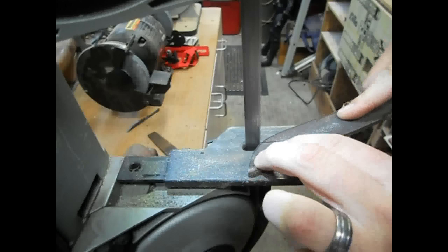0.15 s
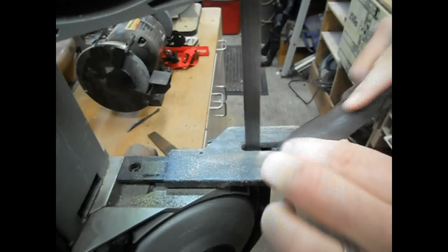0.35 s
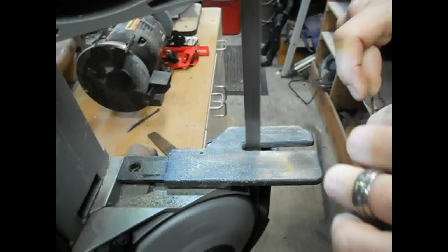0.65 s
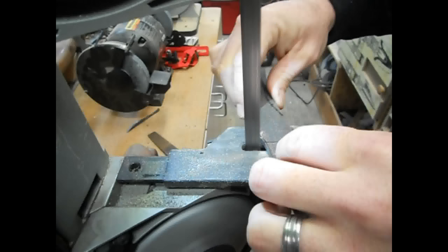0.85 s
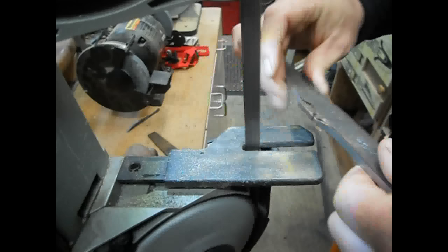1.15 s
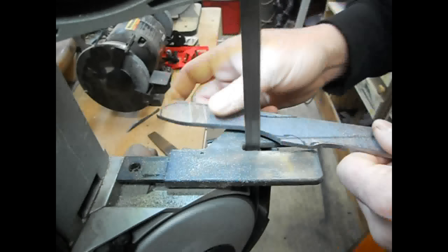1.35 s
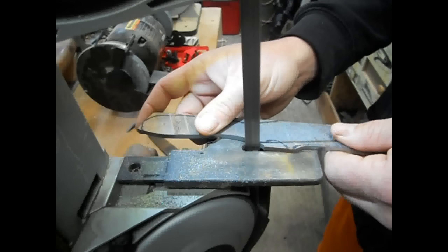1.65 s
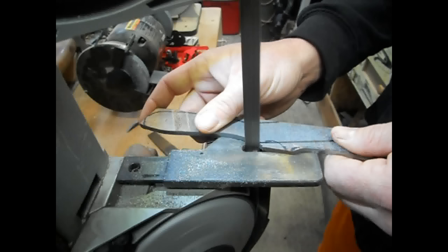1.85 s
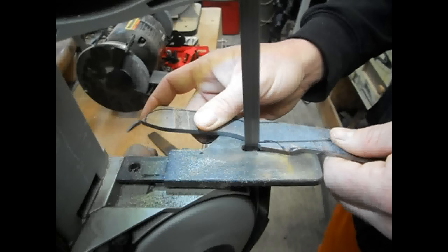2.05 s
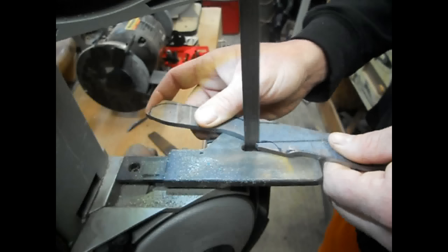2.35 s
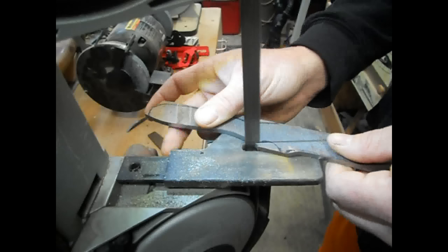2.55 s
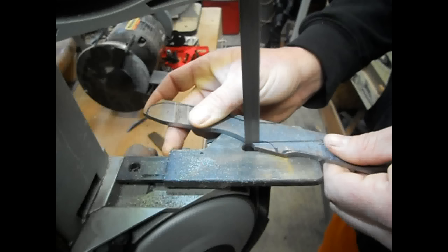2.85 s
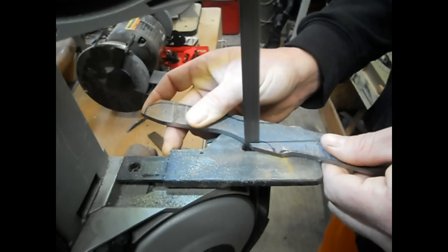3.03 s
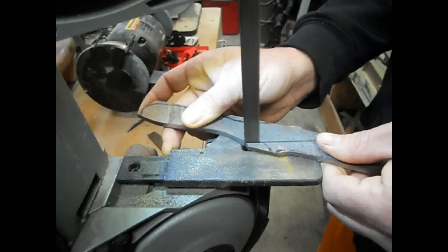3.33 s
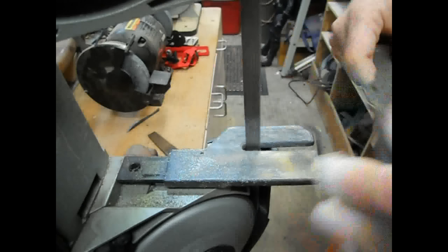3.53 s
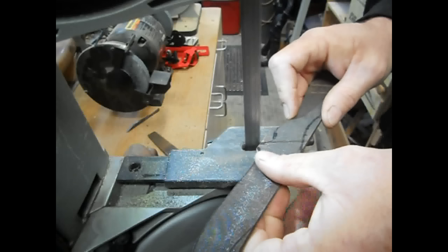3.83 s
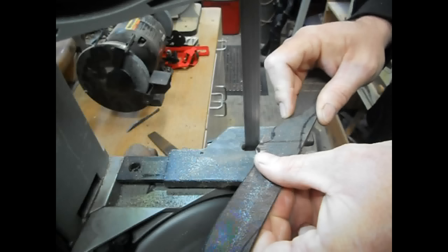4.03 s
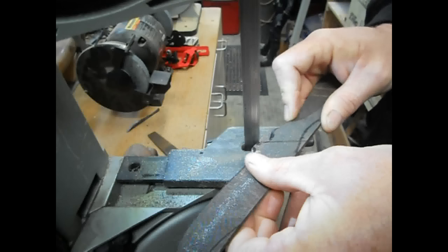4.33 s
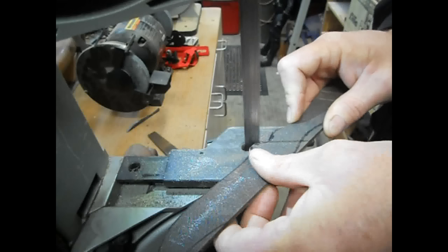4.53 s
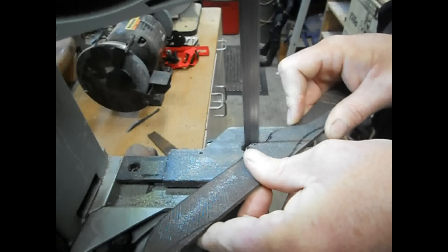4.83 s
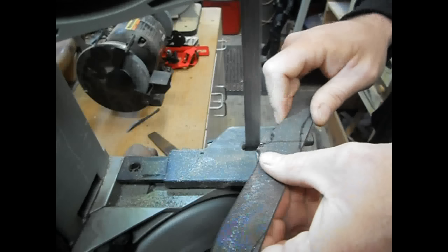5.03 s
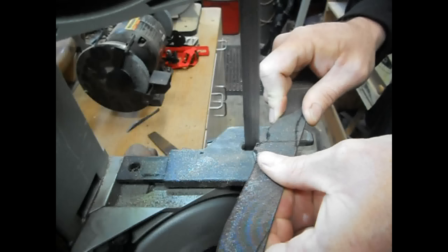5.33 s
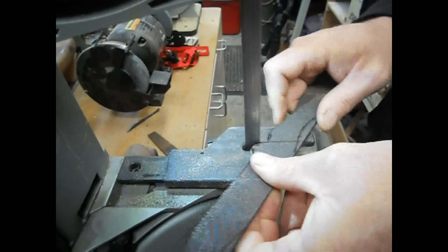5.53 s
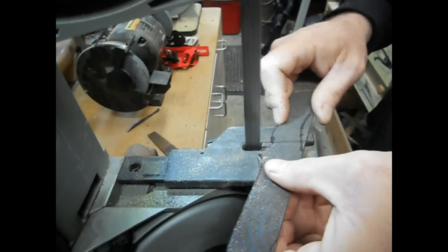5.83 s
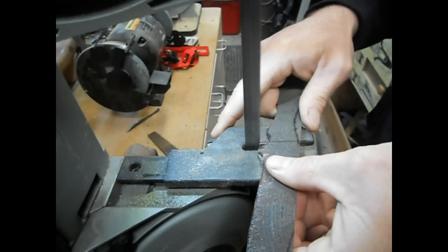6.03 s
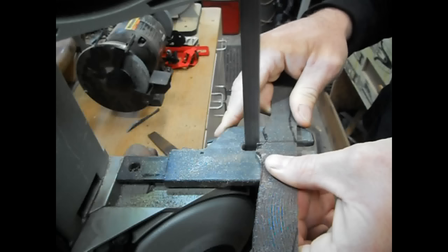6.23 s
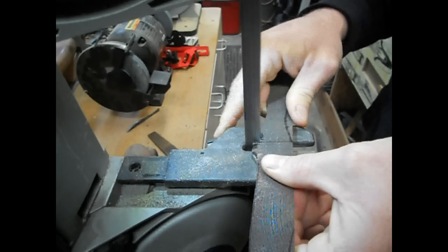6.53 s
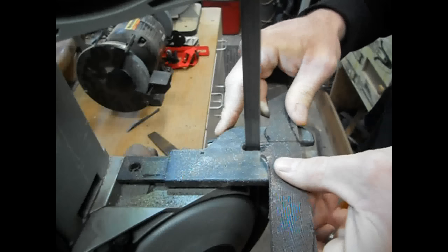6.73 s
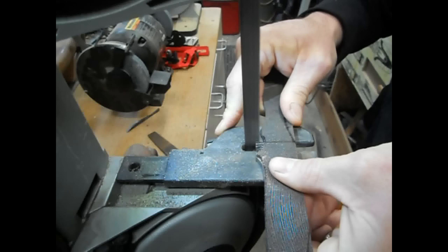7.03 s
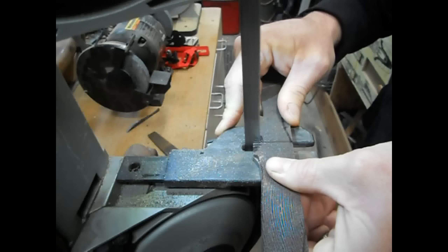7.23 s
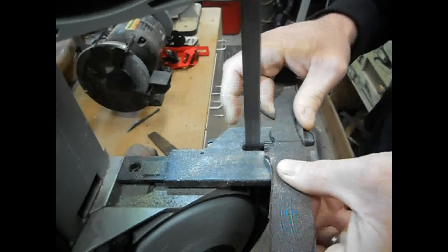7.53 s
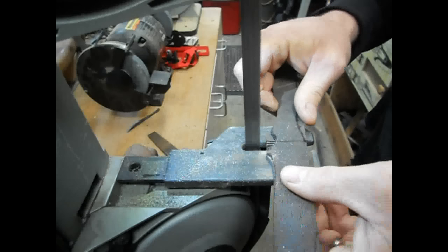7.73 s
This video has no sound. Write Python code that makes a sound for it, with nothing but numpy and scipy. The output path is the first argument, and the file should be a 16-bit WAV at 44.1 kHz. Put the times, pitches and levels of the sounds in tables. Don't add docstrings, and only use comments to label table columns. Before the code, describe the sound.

A metal-cutting bandsaw roars steadily in a workshop, with a thin, very high gear whine wavering and a low growl as steel is cut.

```python
import sys
import numpy as np
from scipy import signal
from scipy.fft import rfft, irfft, next_fast_len
from scipy.io import wavfile
from scipy.ndimage import uniform_filter1d

SR = 44100
rng = np.random.default_rng(int(sys.argv[2]) if len(sys.argv) > 2 else 0)


def unload_audio(sound):
    columns = np.transpose(np.atleast_2d(sound))
    steps = np.round(np.clip(columns, -1, 1) * 32767)
    wavfile.write(sys.argv[1], SR, steps.astype(np.int16))


def amplitude_ratio(level_db):
    exponent = np.asarray(level_db, float) / 20
    return 10 ** exponent


N = 347508

# pitch_hz, level_db (per Hz)
HOUSING_COLOUR = [(20, -23), (120, -22.5), (430, -17), (540, -13), (640, -3), (1300, -3), (1500, -9.5),
                  (2200, -14), (2700, -8), (3100, -4), (5500, -3.5), (7000, -8.5), (8400, -10.5),
                  (10500, -9)]
# pitch_hz, width_hz, level_db (over the housing colour)
FRAME_RINGS = [(66, 26, 9), (690, 70, 0), (781, 26, 3), (1037, 26, 2), (1215, 60, 1), (1550, 25, 4),
               (3103, 36, 4), (3360, 45, 1), (3620, 110, 2), (4150, 50, 2), (4387, 30, 4), (4900, 300, 1),
               (5700, 100, -3), (6210, 60, 3), (8030, 120, -2), (9320, 70, 0)]
# pitch_hz, width_hz, level_db
TABLE_RINGS = [
    (143, 29, -7),
    (206, 40, 2),
    (266, 68, 2),
    (363, 81, -2.5),
]
# pitch_hz, level_db
SHAFT_TONES = [
    (781, -44.5),
    (1037, -46),
    (3103, -47.5),
    (4387, -46.5),
]
# share_of_hum_pitch, level_db (against the growl)
TOOTH_BEATS = [
    (2 / 8, -13),
    (3 / 8, -11),
    (4 / 8, -7),
]
# start_s, roar_db, whistle_db, high_air_db
MACHINE = [(0, -15, -24, -0.5), (.52, -15.5, -24, 0), (.7, -14, -24.5, 0), (1.0, -15, -23.5, 3),
           (1.5, -14, -23, 0.5), (2.0, -15, -25, -4), (2.7, -15, -25, -2), (3.3, -15, -24, -3),
           (3.85, -14.5, -24.5, 4.5), (4.35, -15, -26.5, -3), (4.85, -14, -26, -1), (5.2, -14, -31, -3),
           (5.46, -16.5, -34, -0.5), (5.54, -14.5, -26, -1.5), (5.9, -15, -25.5, 6), (6.3, -15, -23, -2.5),
           (6.85, -15, -24.5, -1.5), (7.88, -15, -24, 5)]
# start_s, end_s, start_force (0-1), end_force (0-1), table_share
PUSHES = [(-.2, .08, .3, 0.12, 4), (.3, .52, .3, 0.2, .6), (.95, 1.18, 0.25, 0.06, .6),
          (1.3, 2.449, 0.1, 1, 1.3), (2.55, 3.42, 0.8, .8, 0.96), (3.55, 3.85, 0, 0.1, .5),
          (4.099, 4.46, 0.46, 0.85, 0.58), (4.497, 4.927, 1, 0.7, .45), (5.12, 5.4, 0.66, 0.45, 1.2),
          (6.039, 6.525, 1, .9, .6), (6.663, 7.449, 0.9, 0.76, 0.58)]
# start_s, sag_hz
SNAGS = [(0.0, 62), (0.075, 50), (0.29, 60), (0.53, 56.6), (0.69, 50), (0.89, 55), (1.07, 45), (1.25, 38.2),
         (1.51, 79), (1.7, 29), (1.87, 35.4), (2.03, 44.5), (2.55, 97.5), (2.74, 58), (3.17, 37.1),
         (3.51, 66.6), (3.85, 70.7), (4.01, 86), (4.19, 48.7), (4.54, 133.6), (4.73, 40), (5.04, 110.2),
         (5.14, 60), (5.56, 81), (5.64, 109), (5.98, 61.4), (6.1, 96), (6.77, 114.6), (7.18, 60),
         (7.6, 56.5)]
# start_s, rise_hz, whistle_fade_db
SLIPS = [(0.17, 60.4, 2), (0.39, 49.9, 3), (0.6, 80, 0), (0.76, 60, 1), (1.15, 40, 5.5), (2.43, 110, 2),
         (3.435, 222, 6), (3.76, 43, -2), (3.939, 96, -1), (4.48, 121, 4), (4.83, 51.3, 3),
         (4.905, 100, 30), (4.94, 130, -9), (5.49, 139, 1), (5.69, 233, 10), (6.27, 90, 3), (6.43, 110, 4),
         (6.57, 224, 8), (7.24, 108, 5), (7.45, 188, 5), (7.7, 70, 3)]
# start_s, pitch_hz, level_db
FALLING_TONE = [
    (4.72, 10580, -60),
    (4.78, 10510, -36),
    (4.84, 10400, -40),
    (4.93, 10260, -37),
    (4.97, 10200, -60),
]
# pitch_hz, level_db
SIDE_COLOUR = [(400, -58), (600, -29), (1000, -19), (1400, -15), (1900, -39), (3000, -67), (3300, -45),
               (4200, -12), (5300, -21.5), (5600, -60)]
# pitch_hz, share_of_frames_lost
SIDE_LOSS = [(500, .7), (750, .05), (1500, .05), (3400, .13), (4500, .13), (4800, .5)]
# start_s, depth_db, recovery_s
DUCKS = [
    (0.734, 3, 0.29),
    (1.02, 1, 0.073),
    (2.4, 1.5, 0.11),
    (3.42, 0.5, 0.04),
    (4.932, 10, 0.14),
    (6.115, 1.5, 0.27),
    (6.54, -0.5, 0.068),
    (7.679, 1.5, 0.092),
]
# pitch_hz, level_db
TOP_LIMIT = [(10450, 3), (10600, -3.5), (10750, -20), (11000, -15), (11030, -70), (12000, -100)]
GAP_BORDERS = [3000, 3700, 4500, 5300, 6000, 6700, 7500, 8200, 9000, 9700]
# start_s, level_db
SPITS = [
    (0.115, -55),
    (2.2, -63),
    (3.43, -64),
    (6.575, -62),
    (7.43, -62),
]

WHEEL_HZ, HUM_HZ, THROB_HZ = 16.7, 575, 187.5
MESH_HZ, LOUDER_DB_PER_HZ = 10110, 0.0529
SNAG_FALL_S, SNAG_BACK_S, SLIP_RISE_S, SLIP_BACK_S = 0.02, 0.091, 0.024, 0.037
BITE_S, LIFT_S = 0.072, 0.034
BLADE_LAG_S = 0.25


def evened(x):
    return x / np.sqrt(np.mean(x ** 2) + 1e-20)


def read(points, hz):
    f, value = np.transpose(points)
    return np.interp(np.log(hz + 1), np.log(f + 1), value)


def columns(rows, t):
    s, *values = np.transpose(rows)
    return [np.interp(t, s, v) for v in values]


def drift(top_hz, low_hz=1.0):
    band = signal.butter(2, [low_hz, top_hz], "bandpass", fs=SR, output="sos")
    wander = signal.sosfilt(band, rng.standard_normal(N + SR))
    return evened(wander[SR:])


def shaped(x, gain):
    size = next_fast_len(N)
    hz = np.fft.rfftfreq(size, 1 / SR)
    return irfft(rfft(x, size) * gain(hz), size)[..., :N]


def bells(rows, hz):
    power = 0
    for f, width, db in rows:
        power = power + amplitude_ratio(db) ** 2 / (1 + (2 * (hz - f) / width) ** 2) ** 2
    return np.sqrt(power)


def tone(hz, db):
    turns = np.cumsum(hz * np.ones(N)) / SR
    return np.sqrt(2) * amplitude_ratio(db) * np.cos(2 * np.pi * turns)


def above(db, floor_db):
    return amplitude_ratio(db) * np.sqrt(np.maximum(1 - amplitude_ratio(floor_db - db) ** 2, 0.003))


def bump(t, s, rise_s, back_s):
    rise = np.exp(-((t - s) / rise_s) ** 2)
    back = np.exp(-np.maximum(t - s, 0) / back_s)
    return np.where(t < s, rise, back)


def wheel_turn():
    t = np.arange(N) / SR
    return np.cos(2 * np.pi * WHEEL_HZ * t + 0.4 * drift(2))


def pushed(t, idle, full, table=False):
    force = 0
    for start, end, start_force, end_force, share in PUSHES:
        push = np.interp(t, [start, start + BITE_S, end - LIFT_S, end], [0, start_force, end_force, 0])
        force = force + push * (share if table else 1)
    return idle + (full - idle) * force


def roar():
    hz, t, z = signal.stft(rng.standard_normal((2, N)), SR, nperseg=512, noverlap=384)
    at = np.minimum(t * SR, N - 1).astype(int)
    roar_db, _, top_db = columns(MACHINE, t)
    lag_frames = max(int(BLADE_LAG_S / t[1]), 1)
    blade_db = uniform_filter1d(pushed(t, -4, 0.5), size=lag_frames)
    patches = rng.standard_normal((len(t), len(hz))).T
    patches = uniform_filter1d(patches, size=12, axis=0)
    patches = evened(uniform_filter1d(patches, size=9, axis=1))
    low = read([(1500, 0.96), (2500, 0.87)], hz)[:, None]
    blade = read([(3650, 0.016), (3900, 1), (4500, 1), (4800, 0.065)], hz)[:, None]
    top = read([(2600, 0), (3200, 0.31), (3900, 0.052), (5200, 0), (6200, 0.17)], hz)[:, None]
    tilt_db = low * 0.5 + blade * blade_db + top * top_db
    wheel_db = 1.1 * wheel_turn()[at]
    throb_db = (1 - 0.81 * low) * (0.56 * patches + wheel_db + 0.53 * drift(25, 16.0)[at])
    throb_db = throb_db + 0.4 * (1 - low) * drift(9, 2.5)[at]
    z = z * amplitude_ratio(roar_db + tilt_db + throb_db)
    noise = signal.istft(z, SR, nperseg=512, noverlap=384)[1][:, :N]
    noise = noise * amplitude_ratio(0.5 * drift(150, 33))

    def housing(hz):
        return amplitude_ratio(read(HOUSING_COLOUR, hz) + 11.5) * np.sqrt(1 + bells(FRAME_RINGS, hz) ** 2)

    return amplitude_ratio(-7.5) * shaped(noise, housing)


def hums():
    t = np.arange(N) / SR
    hum_db = pushed(t, -44, -35.5)
    sing_db = pushed(t, 0, 8)
    shafts = 0
    for hz, db in SHAFT_TONES:
        load_db = (hz > 4000) * sing_db
        shafts = shafts + tone(hz * (1 + 0.008 * drift(12)), db + 3.5 * drift(8) + load_db)
    blade = tone(HUM_HZ + 3.16 * drift(2.99), -3 + 0.81 * drift(5.3))
    return shafts + above(hum_db, -44.0) * blade


def growl():
    growl_db = pushed(np.arange(N) / SR, -42.5, -37.5, table=True)
    rings = evened(shaped(rng.standard_normal(N), lambda hz: bells(TABLE_RINGS, hz)))
    beats = 0
    for share, db in TOOTH_BEATS:
        beats = beats + tone(share * HUM_HZ + 4 * drift(10.5), db + 3 * drift(8.4))
    return above(growl_db, -43.0) * amplitude_ratio(-5.5 + 0.53 * drift(38, 2.2)) * (rings + beats)


def gears(t):
    sag_hz = sum(hz * bump(t, s, SNAG_FALL_S, SNAG_BACK_S) for s, hz in SNAGS)
    slips = np.array([bump(t, s, SLIP_RISE_S, SLIP_BACK_S) for s, *_ in SLIPS])
    race_hz, fade_db = np.transpose(SLIPS)[1:] @ slips
    level_db = columns(MACHINE, t)[1] + LOUDER_DB_PER_HZ * sag_hz - fade_db
    return MESH_HZ - sag_hz + race_hz, level_db


def whistle():
    t = np.arange(N) / SR
    coarse = t[::64]
    hz, db = (np.interp(t, coarse, v) for v in gears(coarse))
    snag = wheel_turn() + 0.8 * drift(60, 15)
    flicker_db = 0.6 * snag + 0.9 * drift(120, 8) - 1.3
    mesh = tone(hz - 24 * snag + 16 * drift(250, 40), db + flicker_db)
    return mesh + tone(*columns(FALLING_TONE, t))


def scene():
    mid, side = roar()
    mid = mid + hums() + growl() + whistle()
    side = shaped(side, lambda hz: amplitude_ratio(read(SIDE_COLOUR, hz)))
    return np.array([mid + side, mid - side])


def gaps(x):
    turns = np.arange(N) / SR * THROB_HZ + 0.2
    size = next_fast_len(N)
    hz, z = np.fft.rfftfreq(size, 1 / SR), rfft(x, size)
    for low_hz, top_hz in zip(GAP_BORDERS, GAP_BORDERS[1:]):
        chance, span = rng.random((int(turns[-1]) + 1, 2))[turns.astype(int)].T
        gap = 1.0 * (chance < 0.04) * (turns % 1 < 0.55 + 0.8 * span)
        gap = uniform_filter1d(gap, size=40)
        band = irfft(z * (hz >= low_hz) * (hz < top_hz), size)[:, :N]
        x = x - gap * band
    return x


def ragged(x):
    hz, t, z = signal.stft(x, SR, nperseg=1024, noverlap=512)
    jump = np.repeat(rng.random(len(t)), 2)[:len(t)] ** 2
    edge_hz = 11030 - (11030 - 10780) * jump
    luck = np.repeat(rng.random((len(t), 2)), 3, axis=0)[:len(t)].T
    luck = luck[1 * (hz > 2500)]
    lost = (z[0] - z[1]) / 2 * (luck < read(SIDE_LOSS, hz)[:, None])
    z = z - np.array([lost, -lost])
    x = signal.istft(z * (hz[:, None] < edge_hz), SR, nperseg=1024, noverlap=512)[1][:, :N]
    t = np.arange(N) / SR
    fizz = evened(shaped(rng.standard_normal(N), lambda hz: (hz > 10800) * (hz < 11350)))
    return x + fizz * sum(amplitude_ratio(db) * np.exp(-((t - s) / 0.013) ** 2) for s, db in SPITS)


def low_pass(x):
    return signal.sosfilt(signal.butter(12, 11880, fs=SR, output="sos"), x)


def record(dry):
    t = np.arange(N) / SR
    duck_db = 0
    for s, db, recovery_s in DUCKS:
        duck_db = duck_db + db * (t > s) * np.exp(-(np.maximum(t - s, 0) / recovery_s) ** 2)
    throb_db = 0.8 * np.cos(2 * np.pi * (THROB_HZ * t - 0.66))
    x = gaps(dry * amplitude_ratio(throb_db - duck_db))
    x = ragged(shaped(x, lambda hz: amplitude_ratio(read(TOP_LIMIT, hz))))
    return low_pass(x)


dry = scene()
out = record(dry)
unload_audio(out)
```